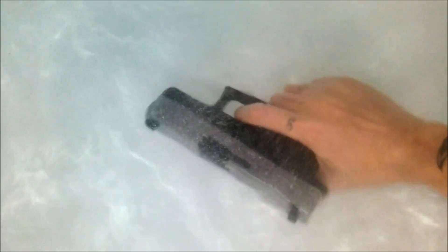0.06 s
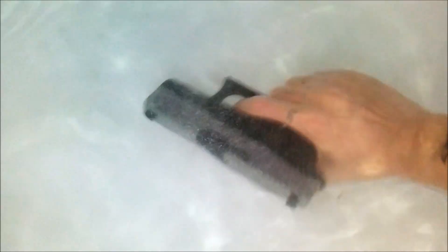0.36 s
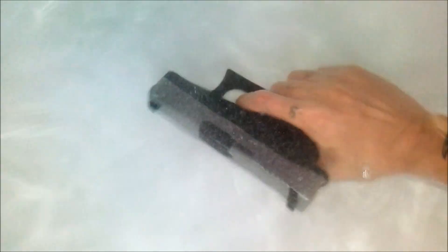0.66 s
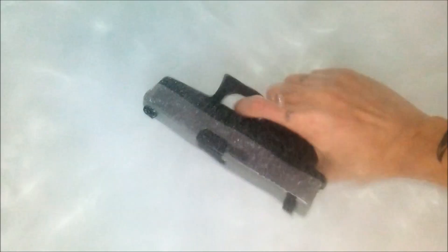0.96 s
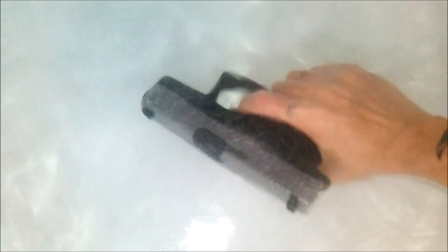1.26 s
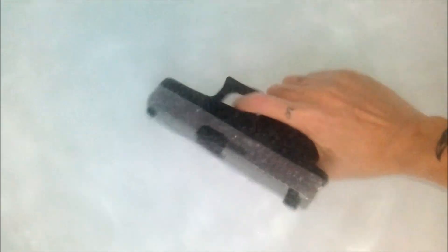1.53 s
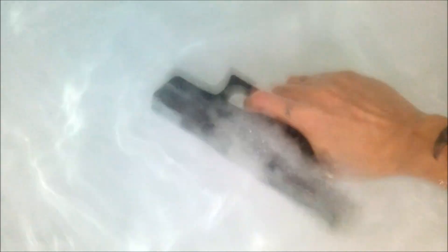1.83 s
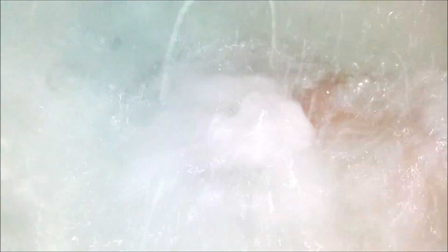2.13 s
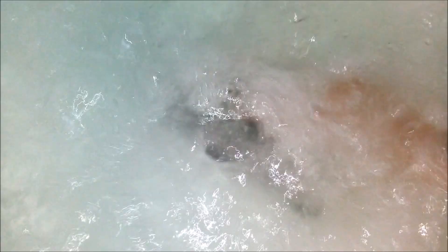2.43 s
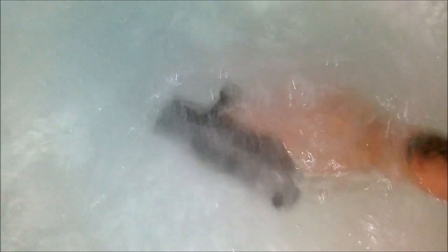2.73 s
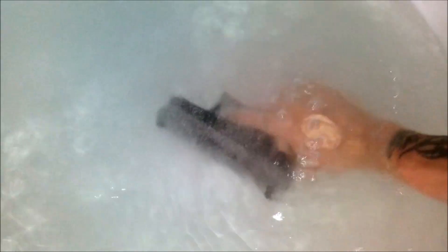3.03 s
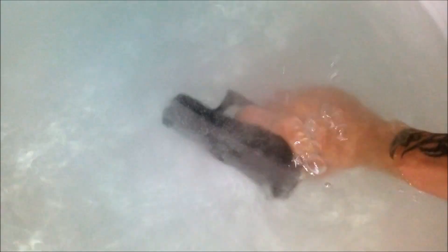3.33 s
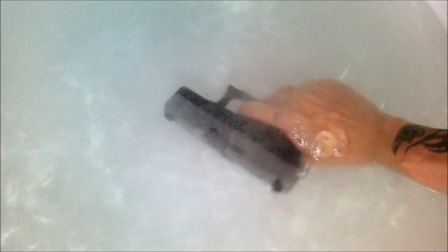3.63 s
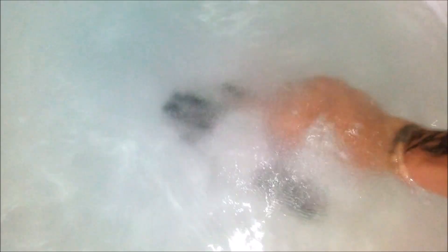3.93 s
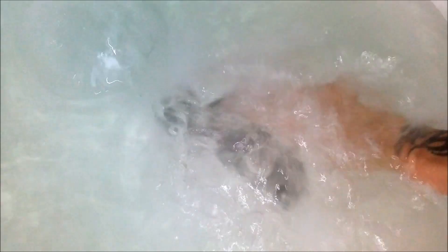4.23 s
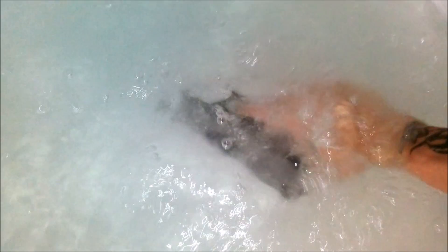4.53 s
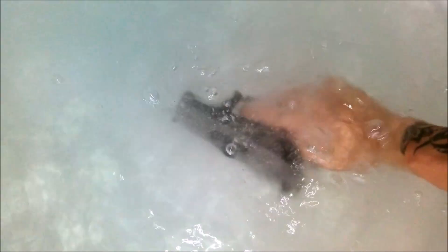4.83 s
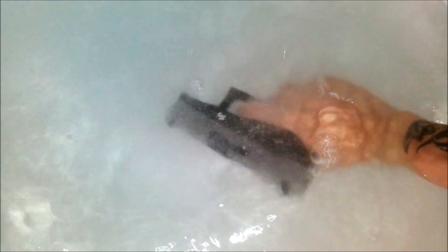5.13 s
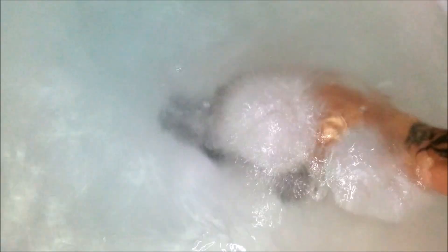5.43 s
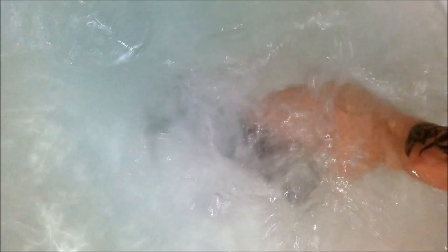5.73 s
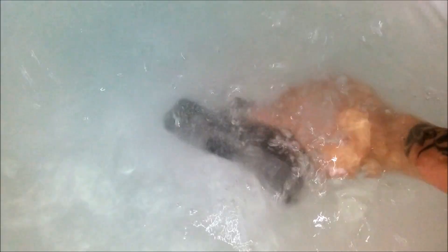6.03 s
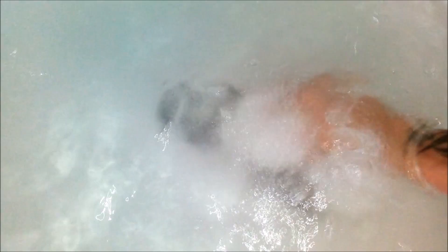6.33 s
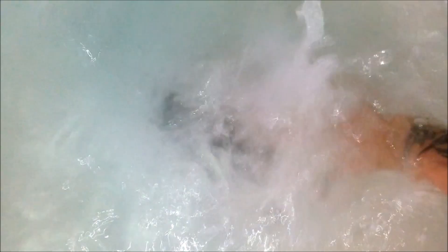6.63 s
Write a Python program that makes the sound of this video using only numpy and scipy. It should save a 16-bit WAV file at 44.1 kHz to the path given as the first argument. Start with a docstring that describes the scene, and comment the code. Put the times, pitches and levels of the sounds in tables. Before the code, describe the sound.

Four underwater handgun shots thud through a tub in a small room, with sloshing water, falling spray and bubbles between them.

```python
"""In a bathtub in a small hard room, a pistol is fired four times under water.
Each shot blows a gas bubble that swells and collapses, thumping the tub, while the steel action clacks
and tiny cavities crackle. Then spray falls back, the water sloshes, the gas fizzes out and bubbles
chirp upward at the surface. The close walls add a short tail, over a faint hiss."""
import sys
import numpy as np
from scipy import signal
from scipy.fft import rfft, irfft, next_fast_len
from scipy.io import wavfile

SR = 44100
rng = np.random.default_rng(int(sys.argv[2]) if len(sys.argv) > 2 else 0)


def persist_wave(psi):
    """Save psi, clipped to +-1, as 16-bit WAV."""
    counts = np.round(np.clip(psi, -1, 1) * 32767).astype(np.int16)
    wavfile.write(sys.argv[1], SR, np.atleast_2d(counts).T)


N = 298557
TIME = np.arange(N) / SR

# hits of the gas on the tub, each shot and then its collapses:
# t/s, low-end lag/s, deep/dB, boom/dB, body/dB, knock/dB
BLOWS = [(1.9578, 0.011, -23, 2.5, 0, -2.5), (2.0181, 0.0035, -3.5, -6.5, 2, -7.5),
         (2.0834, 0.00062, -5.5, -0.5, -3, -8), (3.9787, 0.0024, -20, 1.5, -2, -3),
         (4.0398, 0.0045, -6.5, -32, -5, -12.5), (5.389, 0.0079, -21.5, -7, -4.5, -2.5),
         (5.4641, 0.011, -9, -10.5, -7, -12), (6.3736, 0.0083, -17, -2, -3, -2.5),
         (6.4402, 0.01, -14, -9, -8, -22), (6.5066, 0.00084, -4, -12, -7.5, -15),
         (6.5162, 0.0044, -21, -6.5, -4.5, -15)]
# modes of the filled tub: f/Hz, level/dB, t60/s
TUB_MODES = [(46, -31, 0.96), (84, 1.5, 0.074), (109.2, 0.5, 0.12), (118, -10, .06), (131.55, -1.5, 0.2),
             (180.2, -19.5, 0.47), (182.4, -5.5, 0.12), (240, -15.5, .23), (292, -15, .07),
             (354.7, -14.5, 0.14), (416, -18.5, 0.062), (511, -23, .15), (555, -22.5, 0.19),
             (633, -28, 0.087), (776.4, -24, 0.087), (903, -23, .09), (1064, -22, 0.034),
             (1124, -20.5, 0.091), (1315, -22.5, 0.021), (1240, -24.5, 0.029), (1425, -28.5, 0.1),
             (1512, -30.5, .09)]


def tub():
    """Each blow rings the tub in its own balance; the heavy low modes come late and build slowest."""
    out, t = np.zeros(N), TIME[:SR * 3 // 4]
    hz, db, t60 = np.transpose(TUB_MODES)[:, :, None]
    swell = amp(db - 60 * t / t60) * (1 - np.exp(-t * hz / 0.32))
    swell[1::2] *= -1  # neighbouring modes swing against each other
    detune = 0.024 * np.clip(hz / 400 - .4, 0, 1)  # gas in the water shifts the upper modes
    heavy = hz[:, 0] < 160
    for s, lag, deep, boom, body, knock in BLOWS:
        balance = [(110, deep), (125, boom), (140, boom), (185, body), (450, body), (900, knock)]
        shifted = hz * (1 + detune * rng.standard_normal(hz.shape))
        modes = amp(curve_at(balance, hz)) * swell * np.sin(2 * np.pi * shifted * t)
        add(out, s, modes[~heavy].sum(0))
        add(out, s + lag, modes[heavy].sum(0))
    return out * amp(-0.5)


def pushes():
    """Swelling gas shoves the surface up and lets it sink: a quick punch and a slower, deeper one."""
    out, t = np.zeros(N), TIME[:SR // 4]
    quick, slow = t / .003, t / 0.0073
    for s, lag, deep_db, _, body_db, _ in BLOWS:
        add(out, s + lag, amp(deep_db - 1) * quick * (2 - quick) * np.exp(-quick))
        add(out, s + lag, amp(body_db - 19.5) * slow * (2 - slow) * np.exp(-slow))
    return out


# midrange smack of the bursting surface: f/Hz, level/dB
CRACK_EQ = [(60, -19), (200, 4.5), (550, 6.5), (800, 2.5), (1200, 3.5), (1600, -12.5), (2200, -28.5),
            (6000, -33.5), (15000, -54)]


def surface_cracks():
    """The surface bursts with each blow, as hard as its knock."""
    hits = [(s, knock_db - 10.5, .06) for s, *_, knock_db in BLOWS]
    return bursts(hits, rise=0.0023) * noise(CRACK_EQ)


# the shots and the water they stir up: t/s, report/dB, clank/dB, heave/dB, slosh/dB, spray/dB, fizz/dB
SHOTS = [(1.956, -35.5, -42.5, -46, -45, -58, -55.5), (3.977, -27.5, -39, -48, -46, -56.5, -57),
         (5.389, -26, -29.5, -55, -46.5, -54, -57.5), (6.376, -30, -20, -47, -45.5, -52, -57)]
# modes of the steel slide: f/Hz, level/dB, t60/s
SLIDE_MODES = [(2010, -3.5, 0.13), (2050, -1.5, 0.076), (2650, -18, 0.059), (3064, -11, 0.041),
               (3410, -19.5, 0.14), (3520, -4.5, 0.034)]
REPORT_LEAD_S = 0.0041


def gun_action():
    """The action cracks just before the gas hits the tub, and the slide rings."""
    out, t = np.zeros(N), TIME[:SR // 4]
    ring = sum(amp(db - 60 * t / t60) * np.sin(2 * np.pi * hz * t) for hz, db, t60 in SLIDE_MODES)
    ring *= 1 - np.exp(-t / .0008)
    for s, report_db, clank_db, *_ in SHOTS:
        add(out, s - REPORT_LEAD_S, snap(report_db, t60=0.16, tilt_db=brightness(s) - 2))
        add(out, s, amp(clank_db) * ring)
    return out


# clouds of tiny cavities: t/s, level/dB
CRACKLES = [(2.02, -33), (2.034, -33), (4.037, -31.5), (4.047, -29.5), (5.4521, -32.5), (6.434, -31),
            (6.4976, -30.5)]
# sharp snaps of the action and of single large cavities: t/s, level/dB, treble tilt/(dB per octave)
SNAPS = [(2.0106, -31, -1), (2.0305, -36, 14), (2.089, -18, 3), (2.122, -27, -7), (4.0991, -34, 5.5),
         (5.5155, -25.5, 1), (6.5227, -20.5, 3), (6.554, -26, -0.5)]


def crackles():
    """Cavities crackle as the gas bubble collapses, with short snaps as accents."""
    out = np.zeros(N)
    for s, db in CRACKLES:
        add(out, s, snap(db, t60=0.14, tilt_db=brightness(s)))
    for s, db, tilt_db in SNAPS:
        add(out, s, snap(db, t60=0.038, tilt_db=tilt_db))
    return out


# bite of a snap: f/Hz, level/dB
SNAP_EQ = [(300, -16), (1200, 3), (2200, 4.5), (3500, 2.5), (5500, -3), (6500, -7.5), (7600, -21),
           (11000, -25.5), (15500, -50.5)]


def snap(db, t60, tilt_db):
    """A ragged noise burst, the sound of many tiny cavities closing."""
    t = TIME[:SR // 4]
    envelope = amp(db - 60 * t / t60) * (1 - np.exp(-t / 0.0024))
    ragged = amp(4.6 * wobble(len(t), hz=488))
    return envelope * ragged * colour(rng.standard_normal(len(t)), SNAP_EQ, tilt_db)


def brightness(s):
    """Treble tilt in dB an octave at time s: gas left in the water muffles the later shots."""
    return 4 - 1.2 * (s - SHOTS[0][0])


# envelopes of the water after every shot: delay/s, attack/s, hold/s, fall/(dB per s)
HEAVE_ENV = (0.26, 0.057, .12, 48)
SLOSH_ENV = (0.19, 0.06, 0.095, 42)
SPRAY_ENV = (0.24, 0.11, 0.036, 133)
FIZZ_ENV = (0.2, .2, 0.055, 11)
# gas pockets breaking the surface: peak t/s, heave/dB, slosh/dB, spray/dB
SURGES = [(2.285, -44, -42, -45), (2.62, -40, -55, -60), (2.8, -51.5, -55, -71), (4.5, -56.5, -43.5, -54.5),
          (6.728, -42, -37.5, -51)]
SURGE_HALF_WIDTH_S = 0.027
# low heave, midrange slosh and bright spray: f/Hz, level/dB
HEAVE_EQ = [(15, 14), (30, -9.5), (47, -2), (65, -5.5), (100, -8), (135, 2.5), (200, -18.5), (350, -28.5),
            (900, -58)]
SLOSH_EQ = [(120, -16), (330, -0.5), (650, -1.5), (1000, -5.5), (1800, -8.5), (2800, -21.5), (6000, -45)]
SPRAY_EQ = [(800, -17.5), (2200, 4.5), (4000, 7.5), (6200, 4), (7400, -12), (11500, -14), (13000, -28.5),
            (15500, -38.5)]


def water():
    """The bath heaves, slops in coarse bubbles and is sprinkled with fine spray and fizz."""
    power = np.zeros((4, N))
    shapes = [settling(*motion) for motion in (HEAVE_ENV, SLOSH_ENV, SPRAY_ENV, FIZZ_ENV)]
    for s, _, _, *levels in SHOTS:
        for layer, shape, db in zip(power, shapes, levels):
            add(layer, s, (amp(db) * shape) ** 2)
    for s, *levels in SURGES:
        surge = 1 / (1 + ((TIME - s) / SURGE_HALF_WIDTH_S) ** 2)
        for layer, db in zip(power, levels):
            layer += (amp(db) * surge) ** 2
    heave, slosh, spray, fizz = np.sqrt(power)
    slosh = slosh * amp(2.2 * wobble(N, hz=36))  # the waves lap unevenly
    spray = np.hypot(spray, fizz)
    coarse = colour(plinks(280, 2800, per_s=480, cycles=9, spread_db=3, glide=0.035), SLOSH_EQ)
    fine = colour(plinks(1800, 13000, per_s=450, cycles=14, spread_db=6, glide=.02), SPRAY_EQ)
    ticks = plinks(3000, 12000, per_s=70, cycles=1.5, spread_db=6, glide=0, count=8)
    patter = colour(ticks, SPRAY_EQ, tilt_db=6)
    lively = np.minimum(spray / amp(-55), 1) ** 0.68  # heavy spray plinks; calm water only fizzes
    sparkle = lively * (amp(-5.5) * fine + amp(-12.5) * patter)
    return (heave * noise(HEAVE_EQ)
            + slosh * (amp(-4.5) * coarse + amp(-13) * noise(SLOSH_EQ))
            + spray * (sparkle + amp(-8) * noise(SPRAY_EQ)))


def settling(delay, attack, hold, fall_db_per_s):
    """One motion of the water after a shot: it waits, rises, holds and dies away."""
    t = TIME - delay
    return np.clip(t / attack, 0, 1) * amp(-fall_db_per_s * np.maximum(t - attack - hold, 0))


def plinks(low_hz, high_hz, per_s, cycles, spread_db, glide, count=36):
    """A crowd of small bubbles of many sizes, each a dying note bent upward by glide."""
    out = np.zeros(N)
    for hz in np.geomspace(low_hz, high_hz, count):
        age = np.arange(int(5 * cycles / hz * SR)) / SR * hz / cycles  # in decay times
        envelope = np.exp(-age) * (1 - np.exp(-10 * age))
        note = envelope * np.sin(2 * np.pi * cycles * age * (1 + glide * age))
        born = rng.random(N) < per_s / count / SR
        size = np.minimum(rng.exponential(1, N), 3)
        triggers = born * amp(spread_db * size)
        out += np.sqrt(hz) * unit(signal.oaconvolve(triggers, note)[:N])
    return out


# single bubbles of nearly steady pitch: t/s, length/s, f/Hz, level/dB
PLOPS = [(2.534, 0.012, 260, -53), (2.552, 0.018, 2240, -54.5), (2.774, 0.051, 302, -49),
         (2.865, 0.011, 2130, -60), (2.99, 0.074, 1328, -60.5), (3.058, 0.016, 265, -56.5),
         (3.147, 0.0064, 372, -51), (3.217, 0.0096, 277, -61), (3.335, 0.011, 1420, -60),
         (3.5, 0.0079, 349, -59.5), (3.544, 0.0081, 5740, -57.5), (4.344, 0.018, 1976, -53),
         (4.406, 0.012, 3660, -50.5), (4.497, .019, 504, -37), (4.51, 0.011, 2290, -51),
         (4.525, 0.015, 546, -36), (4.548, 0.017, 753, -41.5), (5.694, 0.017, 822, -42),
         (6.016, 0.063, 344, -57), (6.15, 0.046, 364, -63), (6.326, 0.013, 1396, -56),
         (6.338, 0.058, 404, -58)]
# gas gurgling up on a rising note: t/s, starting f/Hz, level/dB
GURGLES = [(2.269, 591, -44), (2.413, 1088, -48), (2.716, 480, -51), (2.76, 480, -49), (2.828, 717, -56.5),
           (2.94, 546, -52.5), (3.012, 601, -60), (3.092, 645, -57.5), (3.2, 666, -60.5),
           (3.288, 640, -63.5), (3.393, 718, -62), (3.69, 698, -69), (3.755, 720, -71.5),
           (4.335, 601, -52.5), (4.605, 780, -56.5), (4.718, 620, -55), (4.82, 480, -53.5),
           (5.13, 720, -68.5), (5.286, 763, -69.5), (5.815, 523, -54), (5.923, 1062, -57.5),
           (5.99, 557, -62), (6.055, 580, -59.5), (6.115, 600, -66), (6.18, 520, -61.5), (6.255, 481, -64)]
GURGLE_S, GLIDE_OCT_PER_S, GLIDE_CAP_OCT = .075, 1.2, 1.55
TWIN_RATIO, TWIN_DB = 1.25, -13  # a smaller bubble rises alongside


def bubbles():
    """The gas comes up in plops and gurgling pairs; the longer after a shot, the wider a pair glides."""
    out = np.zeros(N)
    for s, length, hz, db in PLOPS:
        add(out, s, amp(db) * bubble(length, hz, octaves=.15))
    for s, hz, db in GURGLES:
        since_shot = s - max(shot[0] for shot in SHOTS if shot[0] < s)
        scatter = 1 + 0.11 * rng.uniform(-0.9, 1, 2)
        main_oct, twin_oct = min(GLIDE_OCT_PER_S * since_shot, GLIDE_CAP_OCT) * scatter
        add(out, s, amp(db) * bubble(GURGLE_S, hz, main_oct))
        add(out, s, amp(db + TWIN_DB) * bubble(GURGLE_S, hz * TWIN_RATIO, twin_oct))
    return out


# notes stressed by the air in the tub: f/Hz, level/dB
GURGLE_EQ = [(500, -5.5), (900, -1.5), (1150, -9.5), (1450, 5.5), (1750, 1), (2150, 17.5), (3000, -3.5)]


def bubble(length, hz, octaves):
    """A steady bubble plops cleanly; a far-gliding one swells and gurgles through the tub's resonances."""
    progress = np.linspace(0, 1, int(length * SR))
    glide = np.clip(octaves, 0, 1)
    pitch = hz * 2 ** (octaves * progress ** 1.3)
    note = fuzzy_note(pitch, rough=.14 + .5 * glide, width_hz=220)
    swell = abs(np.sin(np.pi * progress ** (0.37 + 1.1 * glide))) ** 0.35
    return note * amp(glide * curve_at(GURGLE_EQ, pitch)) * swell


# larger drops of spray landing: t/s, level/dB, plink f/Hz
DROPS = [(2.233, -35.5, 5260), (2.263, -32, 3700), (2.3274, -37, 2680), (2.401, -37, 2535),
         (2.8404, -44.5, 4220), (4.28, -37, 2740), (5.6502, -39, 3220), (5.726, -35, 1950),
         (5.7573, -31.5, 1960), (5.837, -33.5, 2060), (6.086, -40.5, 4980), (6.7005, -40, 2040),
         (6.7457, -32.5, 3240)]


def drops():
    """A falling drop patters on the surface and traps three tiny bubbles that plink."""
    out = bursts([(s, db - 13, .05) for s, db, _ in DROPS], rise=0.0011) * noise(SPRAY_EQ)
    t = TIME[:SR // 16]
    for s, db, hz in DROPS:
        envelope = amp(db - 14.5 - 60 * t / 0.063) * (1 - np.exp(-t / 0.001))
        for delay, tuning in rng.random((3, 2)):
            pitch = hz * (.75 + 0.47 * tuning) * (1 + 3.3 * t)
            add(out, s + 0.0028 * delay, envelope * fuzzy_note(pitch, rough=1, width_hz=340))
    return out


# decay of the room: f/Hz, t60/s
ROOM_DECAY = [(100, 0.95), (250, 0.68), (700, 0.49), (2000, 0.4), (6000, 0.32), (14000, 0.32)]
# reverb send: f/Hz, level/dB
ROOM_SEND = [(50, -13), (130, -12.5), (250, -7.5), (600, -3), (2000, -4.5), (12000, -8)]


def room(x):
    """Dense reflections from close hard walls, each band dying at its own speed."""
    hz, t, bands = signal.stft(rng.standard_normal(SR), SR, nperseg=512)
    t60 = curve_at(ROOM_DECAY, hz)[:, None]
    bands *= amp(curve_at(ROOM_SEND, hz)[:, None] - 60 * t / t60)
    bands *= np.sqrt(2 * np.log(1000) / (t60 * SR))  # a longer decay adds no energy
    fade_in = np.clip(TIME[:SR] / 0.0079 - 1, 0, 1)  # after a short predelay
    tail = signal.istft(bands, SR, nperseg=512)[1][:SR] * fade_in
    return signal.fftconvolve(x, tail)[:N]


# noise floor: f/Hz, level/dB
HISS_EQ = [(12, -34), (20, -7.5), (38, -7), (80, 1), (106, -7.5), (196, -6.5), (282, -19), (306, -18.5),
           (597, -20), (649, -22), (932, -22.5), (2270, -25.5), (5690, -21.5), (8170, -37.5), (15500, -42)]


def hiss():
    """A faint, steady bed of noise."""
    return amp(-68.5) * noise(HISS_EQ)


def amp(db):
    return 10 ** (np.asarray(db) / 20)


def unit(x):
    """Scales to rms 1."""
    return x / np.sqrt(np.mean(x ** 2) + 1e-20)


def curve_at(points, hz):
    """Joins (Hz, value) points on a log-frequency axis."""
    f, value = np.transpose(points)
    return np.interp(np.log(hz + 1), np.log(f + 1), value)


def add(mix, s, sound):
    """Mixes a sound in at time s."""
    part = mix[max(round(s * SR), 0):][:len(sound)]
    part += sound[:len(part)]


def colour(x, eq, tilt_db=0):
    """Equalises x to rms 1, tilted by tilt_db an octave above 1500 Hz."""
    hz = np.fft.rfftfreq(len(x), 1 / SR)
    gain = amp(curve_at(eq, hz) + tilt_db * np.log2(np.maximum(hz, 1500)))
    return unit(irfft(rfft(x) * gain, len(x)))


def noise(eq):
    """Steady equalised noise."""
    return colour(rng.standard_normal(next_fast_len(N)), eq)[:N]


def bursts(rows, rise):
    """Envelope of overlapping bursts (t/s, level/dB, t60/s), added in power."""
    power, t = np.zeros(N), TIME[:SR // 2]
    for s, db, t60 in rows:
        add(power, s, (amp(db - 60 * t / t60) * (1 - np.exp(-t / rise))) ** 2)
    return np.sqrt(power)


def wobble(length, hz):
    """Smooth random modulation of rms 1, changing about hz times a second."""
    pole = np.exp(-np.pi * hz / SR)
    white = rng.standard_normal(length + SR // 20)
    return unit(signal.lfilter([1], np.poly([pole, pole]), white)[-length:])


def fuzzy_note(hz, rough, width_hz):
    """A note following the curve hz, partly clean and partly smeared over a narrow band."""
    smear = wobble(len(hz), width_hz) + 1j * wobble(len(hz), width_hz)
    tone = np.exp(2j * np.pi * np.cumsum(hz) / SR)
    return unit(((1 + rough * smear) * tone).real)


def scene():
    """The tub, the gun and the water sound in the room, over a faint hiss."""
    shots = tub() + pushes() + surface_cracks() + gun_action() + crackles()
    direct = shots + bubbles() + drops() + water()
    return (direct + room(direct) + hiss())[None]


def record(dry):
    """The microphone sheds the deepest bass, rounds off the highest peaks and is band-limited."""
    x = signal.sosfilt(signal.butter(1, 25, "highpass", fs=SR, output="sos"), dry)
    x = x / (1 + x ** 8) ** (1 / 8)
    lowpass = signal.firwin(511, 15500, window=("kaiser", 9), fs=SR)
    return signal.oaconvolve(x, lowpass[None], "same")


dry = scene()
out = record(dry)
persist_wave(out)
```